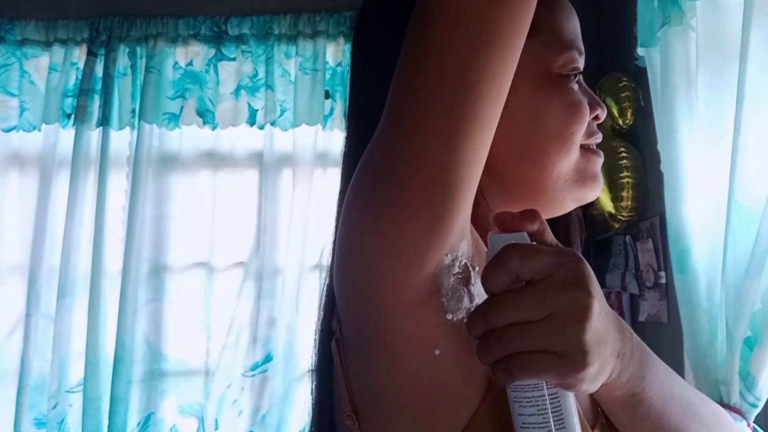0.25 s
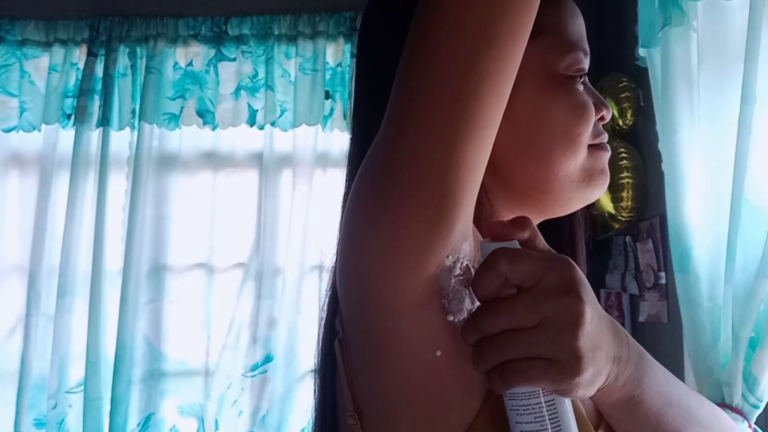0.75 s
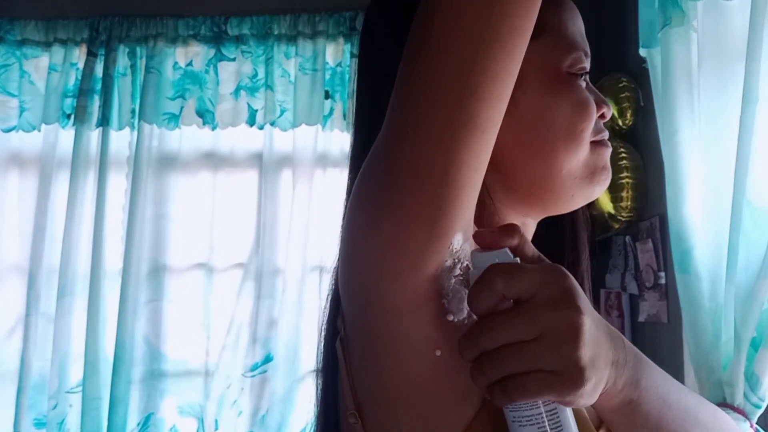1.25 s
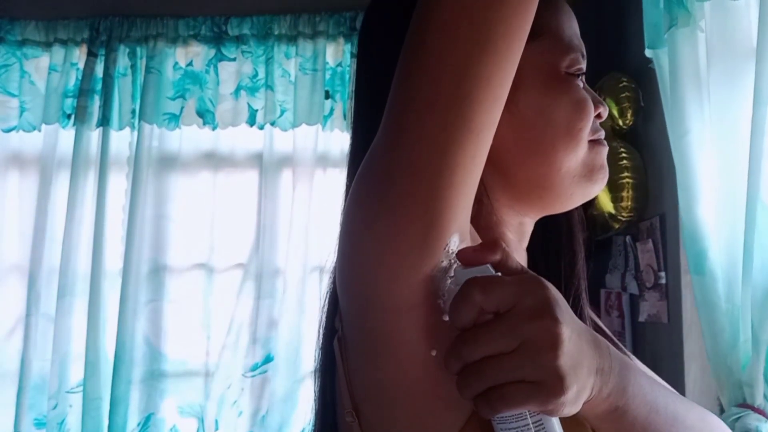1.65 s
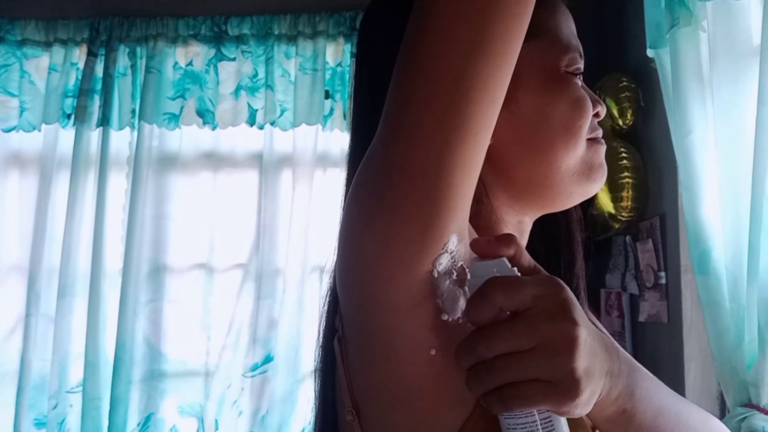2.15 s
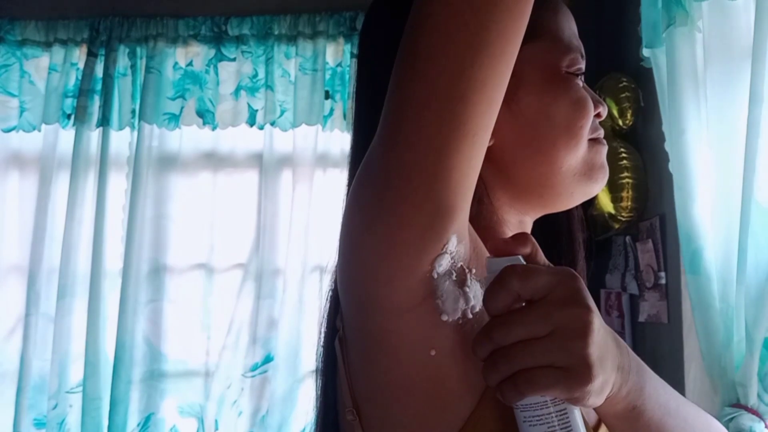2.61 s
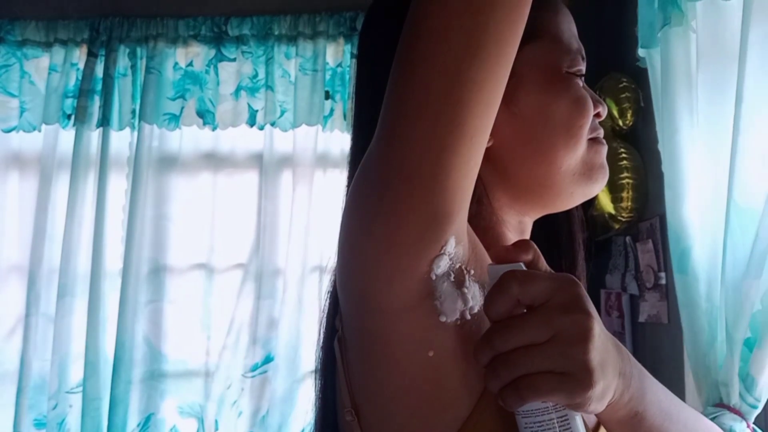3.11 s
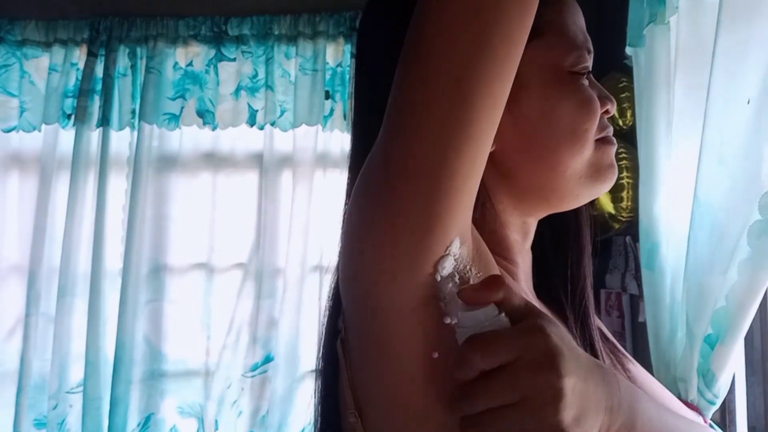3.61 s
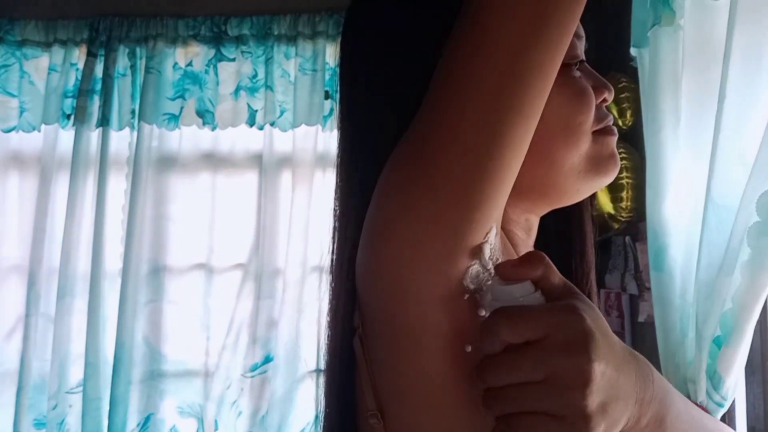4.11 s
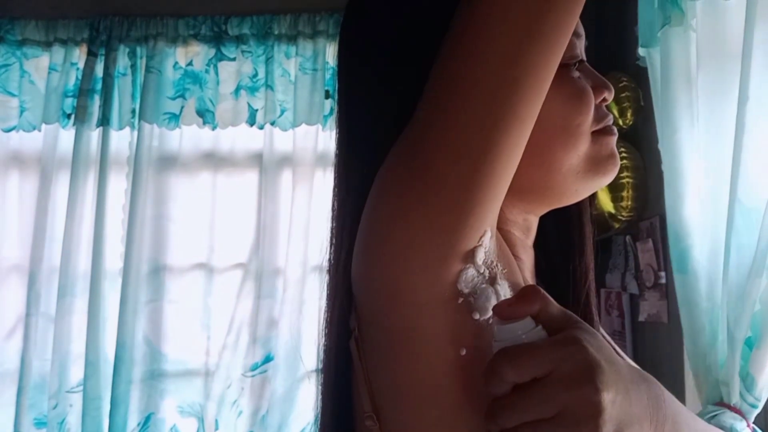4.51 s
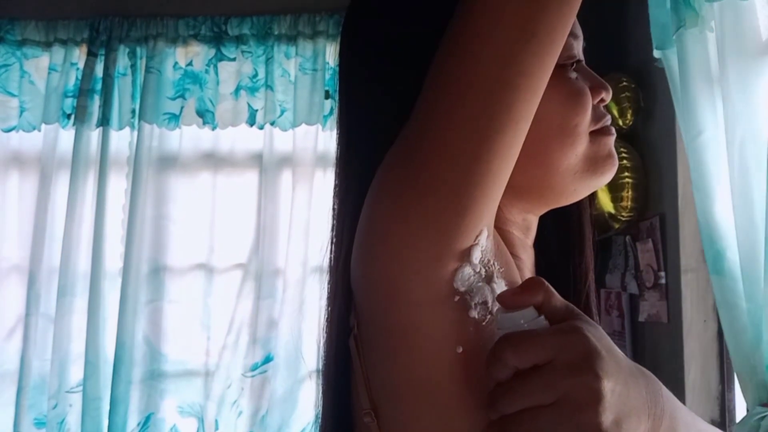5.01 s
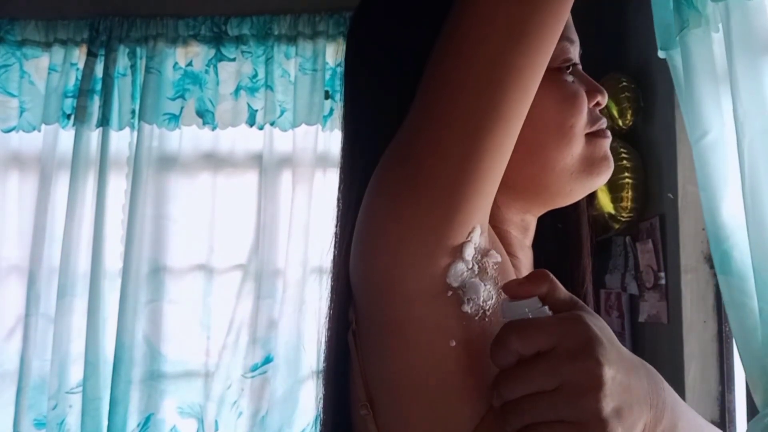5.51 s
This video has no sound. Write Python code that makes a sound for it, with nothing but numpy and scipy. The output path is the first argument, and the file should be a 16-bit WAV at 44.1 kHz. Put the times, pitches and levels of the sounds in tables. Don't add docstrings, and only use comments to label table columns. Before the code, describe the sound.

Bright, dry-edged aerosol hisses with wet droplet crackle sit in the centre, very near the microphone, each only a fraction of a second long. Brief puffs and a few small button creaks fill the gaps. Behind them are a continuous airy fan, soft booming knocks through the house, and faint distant hoots and scrapes. The small room adds close reflections and a short, light tail.

```python
import sys
import numpy as np
from scipy import signal
from scipy.fft import rfft, irfft, next_fast_len
from scipy.io import wavfile
from scipy.ndimage import uniform_filter1d, map_coordinates

SR = 44100
rng = np.random.default_rng(int(sys.argv[2]) if len(sys.argv) > 2 else 0)


def attenuation_scalar(level_db):
    decades = np.asarray(level_db, float) / 20
    return 10 ** decades


def transcribe(u):
    v = np.clip(np.atleast_2d(u).T, -1, 1)
    q = np.round(v * 32767).astype(np.int16)
    wavfile.write(sys.argv[1], SR, q)


N = 253663
T = np.arange(N) / SR

# (valve opens [s], flow crests [s], valve shuts [s])
PRESSES = [
    (.977, 1.1, 1.172),
    (1.868, 2.01, 2.072),
    (3.217, 3.244, 3.284),
    (3.305, 3.35, 3.376),
    (3.952, 4.034, 4.132),
    (4.82, 4.897, 4.917),
    (5.322, 5.428, 5.492),
]
# (jet at opening [dB], jet at crest [dB], low cap mode over jet [dB],
# high cap mode over jet [dB], splash over jet [dB])
PRESS_AIM = [
    (-19, -16, -16.5, -20, -17),
    (-24, -13, -22.5, -18.5, -17),
    (-19, -15.5, -15, -17, -21),
    (-29, -23.5, -13.5, -17, -19.5),
    (-23.5, -10.5, -14.5, -15, -19),
    (-27, -18.5, -12, -15.5, -16.5),
    (-29, -13.5, -11, -15, -17.5),
]


def unit(x):
    return x / np.sqrt(np.mean(x ** 2) + 1e-20)


def along(points, hz):
    f, v = np.transpose(points)
    return np.interp(np.log(hz + 1), np.log(f + 1), v)


def wobble(rate_hz):
    knots = rng.standard_normal(int(N * rate_hz / SR) + 4)
    return map_coordinates(knots, [T * rate_hz])


def filtered(x, response):
    m = next_fast_len(N + 8192)
    return irfft(rfft(x, m) * response(np.fft.rfftfreq(m, 1 / SR)), m)[..., :N]


def patchy(patchy_db, channels, size=512):
    z = signal.stft(rng.standard_normal((channels, N)), nperseg=size)[2]
    field = uniform_filter1d(rng.standard_normal(z.shape[1:]), size=5, axis=0)
    field = uniform_filter1d(field, size=5000 // size + 1, axis=1)
    return signal.istft(z * attenuation_scalar(patchy_db * unit(field)), nperseg=size)[1][:, :N]


def background(spectrum, patchy_db, ripple_db):
    # (frequency [Hz], left minus right [dB])
    lean = [(60, .3), (200, -.6), (310, -7), (600, -5), (1300, -12.5), (2400, -10), (4400, -8.5),
            (8100, 5.5), (15000, 3)]
    # (frequency [Hz], likeness of the channels [0-1])
    alike = [(60, 0.98), (130, 0.99), (290, 0.99), (640, 0.99), (1410, 0.92), (3100, 0.93), (6820, 1),
             (15000, 0.51)]
    knots = rng.standard_normal(200)

    def mid_side(hz):
        ripple = ripple_db * map_coordinates(knots, [hz / 120])
        turn = np.arccos(np.clip(along(alike, hz), 0, 1)) / 2
        return attenuation_scalar(along(spectrum, hz) + ripple) * [np.cos(turn), np.sin(turn)]

    mid, side = filtered(patchy(patchy_db, channels=2, size=1536), mid_side)
    pair = np.array([mid + side, mid - side])
    pair = filtered(pair, lambda hz: attenuation_scalar(along(lean, hz) * [[.5], [-.5]]))
    return pair / np.std(pair.mean(0))


def fan():
    # (frequency [Hz], level [dB per Hz])
    rush_colour = [(240, -55), (400, -2), (411, -25.5), (463, -19), (858, -8), (1260, -3), (1320, -6.5),
                   (1440, -2.5), (2100, -15.5), (2730, -16.5), (4620, -120)]
    # (frequency [Hz], level [dB per Hz])
    hiss_colour = [(1000, -20), (1900, -10), (2400, -6), (2900, -6), (4450, -3), (4950, -9), (5550, -2),
                   (6600, -2), (7500, -6), (8500, -22), (9250, -38), (10300, -29), (11450, -36),
                   (11750, -21), (15500, -17)]
    pressing_s = .12
    pressing = sum(np.exp(-((T - shuts_s) / pressing_s) ** 2) * attenuation_scalar(crest_db + 14)
               for (_, _, shuts_s), (_, crest_db, *_) in zip(PRESSES, PRESS_AIM))
    rush_db = -48.5 + 2 * pressing + .9 * wobble(9)
    rush = attenuation_scalar(rush_db) * background(rush_colour, patchy_db=3.2, ripple_db=1.5)
    hiss_db = -47 - 3 * pressing + 0.76 * wobble(7)
    hiss = attenuation_scalar(hiss_db) * background(hiss_colour, patchy_db=3.1, ripple_db=1.5)
    return rush + hiss


def swells(times_s, peaks_db, hum_db, swell_db_per_s):
    t = T[::100]
    blows = sum(attenuation_scalar(db - swell_db_per_s * abs(t - s)) ** 2 for s, db in zip(times_s, peaks_db))
    return 10 * np.log10(np.interp(T, t, blows) + attenuation_scalar(hum_db + 2.2 * wobble(8)) ** 2)


def thuds():
    # (time [s], boom level [dB], thump level [dB])
    blows = [(.06, -54, -55.5), (.16, -47.5, -64), (.27, -48, -53), (.37, -50, -55), (.61, -47, -56),
             (.89, -46.5, -68), (1.1, -37.5, -51), (1.16, -50, -57), (1.28, -62, -52.5), (1.5, -43.5, -62),
             (1.95, -55, -65), (2.11, -48, -70), (2.37, -61, -62), (2.5, -51, -70), (2.63, -55, -64),
             (3.2, -48, -49), (3.46, -47.5, -70), (4.08, -53, -70), (4.45, -45.5, -72), (4.71, -49, -66),
             (4.93, -58, -77), (5.25, -55, -67), (5.65, -66, -61)]
    # (time [s], drone level [dB])
    knocks = [(.05, -47), (.16, -46.5), (.26, -44), (.36, -49), (.77, -50), (.96, -42), (1.1, -48),
              (1.5, -45), (2.02, -46), (2.16, -42.5), (2.3, -43), (2.36, -53), (2.65, -48), (3.33, -49),
              (3.72, -47), (3.85, -47.5), (3.99, -44.5), (4.13, -48.5), (4.31, -55), (5.22, -49),
              (5.65, -45.5)]
    # (frequency [Hz], level [dB per Hz])
    thump_colour = [(15, -40), (30, -9), (50, -9), (75, 9), (90, -2), (130, -40)]
    # (frequency [Hz], level [dB per Hz])
    boom_colour = [(50, -50), (85, -10), (100, 0), (118, -4), (138, 2), (200, -12), (260, -18), (400, -60)]
    # (frequency [Hz], level [dB per Hz])
    drone_colour = [(120, -36), (200, -15), (226, -4.5), (258, -7.5), (312, 7), (388, -8.5), (430, -16),
                    (480, -13), (620, -28), (1060, -120)]
    times_s, booms_db, thumps_db = np.transpose(blows)
    thump_db = swells(times_s, thumps_db, hum_db=-75.5, swell_db_per_s=157)
    boom_db = swells(times_s, booms_db, hum_db=-55.5, swell_db_per_s=201) + 1.1 * wobble(18)
    drone_db = swells(*np.transpose(knocks), hum_db=-57.5, swell_db_per_s=210) + 1.5 * wobble(22)
    thump = attenuation_scalar(thump_db) * background(thump_colour, patchy_db=1.2, ripple_db=0)
    boom = attenuation_scalar(boom_db) * background(boom_colour, patchy_db=1.2, ripple_db=0)
    drone = attenuation_scalar(drone_db) * background(drone_colour, patchy_db=1.2, ripple_db=0)
    return thump + boom + drone


def far_notes():
    # (time [s], frequency [Hz], width [Hz], level [dB], half length [s])
    hoots = [(.34, 235, 8, -42, .08), (.09, 950, 450, -50, .04), (.1, 1550, 250, -52, .12),
             (.65, 620, 40, -59, .03), (2.2, 1230, 60, -51, .1), (3.82, 1250, 30, -48, .04),
             (3.92, 680, 60, -57, .03), (4.07, 1050, 250, -45, .06), (4.43, 1340, 35, -43.5, .06),
             (4.61, 1050, 120, -50, .04), (4.93, 900, 150, -51, .08), (5.66, 760, 120, -56, .05)]
    notes = np.zeros(N)
    for s, hz, width_hz, db, half_s in hoots:
        narrow = filtered(rng.standard_normal(N), lambda f: np.exp(-((f - hz) / width_hz) ** 2))
        swell = np.exp(-((T - s) / half_s) ** 4)
        rms = np.sqrt(np.sum((swell * narrow) ** 2) / np.sum(swell ** 2))
        notes += attenuation_scalar(db) * swell * narrow / rms
    return notes * attenuation_scalar(np.array([[-3.5], [2.5]]))


def flow(opens_s, crests_s, shuts_s, opening_db, crest_db):
    to_come = 1 - np.clip((T - opens_s) / (crests_s - opens_s), 0, 1) ** 0.41
    fall_db = 19.5 * np.clip((T - crests_s) / (shuts_s - crests_s), 0, 1) ** 2.12
    return crest_db - (crest_db - opening_db) * to_come, fall_db, to_come


def valve():
    # (time [s], jet [dB], cap modes [dB], splash [dB], valve open [ms])
    spits = [(.95, -9.5, -26.5, -28.5, 3.7), (1.0005, -17, -32, -44, 2.1), (1.87, -14, -34, -29.5, 9.4),
             (2.0972, -10.5, -26.5, -29.5, 7), (2.823, -12, -26, -29, 16.4),
             (3.0609, -15, -32.5, -29.5, 12), (3.2324, -16, -35, -34, 3.3), (3.309, -18, -36, -44, 4),
             (3.3182, -6.5, -32, -30, 3), (3.3264, -14, -32, -32, 3.2), (3.346, -9, -30, -30, 4.3),
             (3.4357, -16, -26.5, -37, 6.6), (3.4492, -12, -30, -43, 2.4), (3.9535, -10, -31, -51, 5.2),
             (4.1737, -20, -30, -40, 8), (4.599, -17, -24, -43, 4.2), (4.822, -14, -34, -49, 3),
             (4.973, -13, -28, -28, 21), (5.067, -26, -30.5, -42, 2.5), (5.3238, -26, -43, -52, 2),
             (5.493, -14, -33, -33, 3), (5.5188, -7, -23, -27.5, 3.8)]
    # (time [s], level [dB])
    ticks = [
        (3.5568, -55),
        (3.808, -34.5),
        (3.8621, -29),
    ]
    fade_share = [0.81, 0.97, 0.6, 0.52]
    build_db = [-2, 1, 1.5]
    spit_db = [-1, -0.5]
    # jet, low mode, high mode, splash [s]
    empty_s = [.035, .04, .04, 0.14]
    tick_db, tick_ms = np.array([-33, -17, -0.5, -21]), 2.3

    gain = np.zeros((4, N))
    sputter_db = 1.0 * wobble(90) + 1.3 * wobble(300)
    for press, (opening_db, crest_db, *aim_db) in zip(PRESSES, PRESS_AIM):
        opens_s, _, shuts_s = press
        jet_db, fall_db, to_come = flow(*press, opening_db, crest_db)
        over_db = np.c_[[0, *aim_db]] - np.outer([0, *build_db], to_come) - np.outer(fade_share, fall_db)
        opening = np.clip((T - opens_s) / .0008, 0, 1)
        emptying = attenuation_scalar(-60 * np.maximum(T - shuts_s, 0) / np.c_[empty_s])
        gain += opening * emptying * attenuation_scalar(jet_db + sputter_db + over_db)

    shorts = [(s, np.r_[jet_db, cap_db + np.array(spit_db), splash_db], ms)
              for s, jet_db, cap_db, splash_db, ms in spits]
    shorts += [(s, db + tick_db, tick_ms) for s, db in ticks]
    for s, db, ms in shorts:
        span = slice(round((s - .001) * SR), round((s + .03) * SR))
        t = T[span] - s
        opening = np.clip((t + .0007) / .001, 0, 1)
        sag_db = .45 * np.clip(1000 * t, 0, ms)
        emptying_db = 60 * np.maximum(t - ms / 1000, 0) / .004
        gain[:, span] += opening * attenuation_scalar(-emptying_db - sag_db) * attenuation_scalar(db[:, None] - 7)
    return gain


def spray():
    # (frequency [Hz], level [dB per Hz])
    jet_colour = [(8000, -40), (9200, -25), (10100, -19), (11300, -24), (12200, -13), (13200, -9),
                  (14300, -2), (15500, 0)]
    # (frequency [Hz], level [dB per Hz])
    cap_low_colour = [(4600, -45), (5600, -9), (6000, -0.5), (6500, 5.5), (6900, -2), (8000, -47)]
    # (frequency [Hz], level [dB per Hz])
    cap_high_colour = [(5800, -66), (6600, -3.5), (7100, 3.5), (7600, 0.5), (8400, -7), (8900, -11),
                       (9600, -35), (11500, -48)]
    # (frequency [Hz], level [dB per Hz])
    splash_colour = [(400, -40), (750, -20), (1100, -8), (2200, -4), (2700, -7), (3200, -1), (4200, 0),
                     (4800, -4), (5600, -2), (7000, -30)]
    colours = (jet_colour, cap_low_colour, cap_high_colour, splash_colour)
    droplet_shares = (0.15, 0.17, 0.13, 0.16)
    droplets_db = 3.3 * wobble(1300)
    can = np.zeros(N)
    for gain, colour, share in zip(valve(), colours, droplet_shares):
        eddies = patchy(1.2, channels=1)[0]
        layer = filtered(attenuation_scalar(share * droplets_db) * eddies, lambda hz: attenuation_scalar(along(colour, hz)))
        can += gain * unit(layer)
    return can


def near(x):
    # (delay [ms], level [dB])
    echoes = [(1.1, -17), (2.7, -17), (7.5, -19), (14.6, -12), (19, -15), (24, -15)]
    return filtered(x, lambda hz: 1 + sum(attenuation_scalar(db) * np.exp(-2j * np.pi * hz * ms / 1000) for ms, db in echoes))


def room(x):
    # (frequency [Hz], time to fall 60 dB [s])
    t60 = [(500, 0.24), (3000, 0.84), (7000, 0.5), (10000, 0.48), (12000, 0.45), (15000, 0.31)]
    wet, step, delay = np.zeros((2, N + 2 * SR)), SR // 4, 500
    for start in range(0, N, step):
        hz, t, z = signal.stft(rng.standard_normal((2, SR * 3 // 4)), SR, nperseg=256)
        decay = attenuation_scalar(-60 * t / along(t60, hz)[:, None])
        mid, side = signal.istft(z * decay, SR, nperseg=256)[1]
        tail = (mid + attenuation_scalar(-20) * np.outer([1, -1], side)) / np.linalg.norm(mid)
        answer = signal.fftconvolve(x[None, start:start + step], tail, axes=1)
        wet[:, start + delay:start + delay + answer.shape[1]] += answer
    return wet[:, :N]


def scene():
    backdrop = fan() + thuds() + far_notes()
    can = spray()
    return backdrop + attenuation_scalar(-0.82) * near(can) + attenuation_scalar(-11) * room(can)


def gate(x, low_hz, high_hz, under_db, top_db):
    hz, _, z = signal.stft(x, SR, nperseg=2048)
    power = uniform_filter1d(abs(z.mean(0)) ** 2, size=7, axis=0)
    power = uniform_filter1d(power, size=2, axis=1)
    masker = power[(hz > high_hz) & (hz < 1.15 * high_hz)].mean(0)
    threshold = np.minimum(masker * attenuation_scalar(under_db) ** 2, attenuation_scalar(top_db) ** 2)
    in_band = (hz > low_hz) & (hz < high_hz)
    quiet = (power < threshold) & in_band[:, None]
    return signal.istft(z * ~quiet, SR, nperseg=2048)[1][:, :N]


def low_pass(x):
    return signal.sosfilt(signal.butter(12, 16640, fs=SR, output="sos"), x)


def record(dry):
    limited = filtered(dry, lambda hz: 1 / (1 + (hz / 15500) ** 300))
    kept = gate(limited, low_hz=8700, high_hz=11800, under_db=-12, top_db=-87)
    return low_pass(kept)


dry = scene()
out = record(dry)
transcribe(out)
```